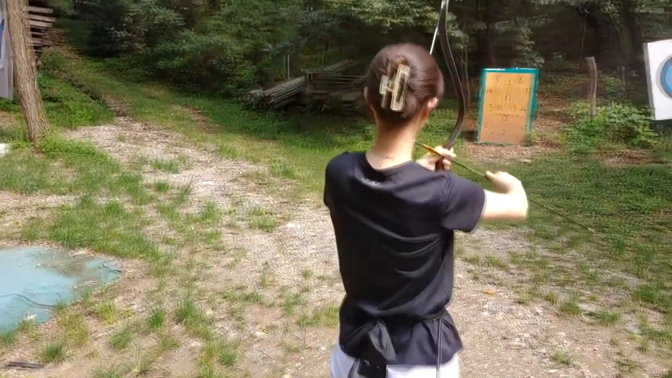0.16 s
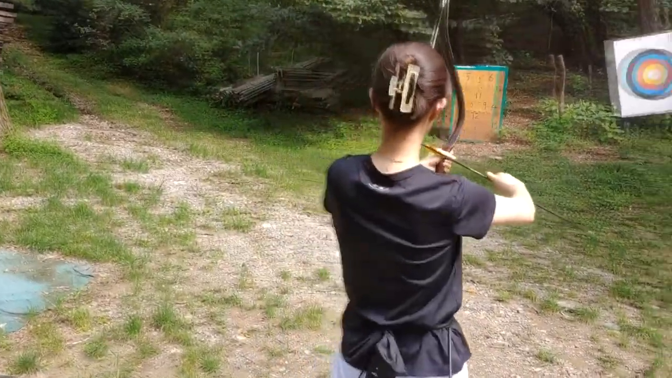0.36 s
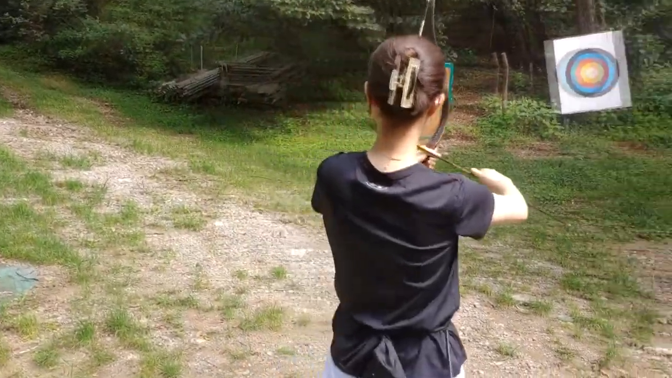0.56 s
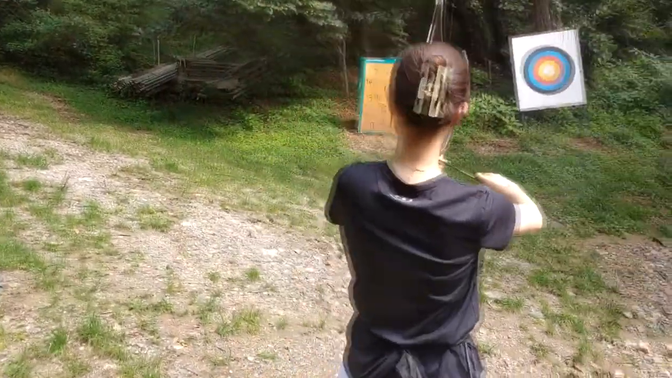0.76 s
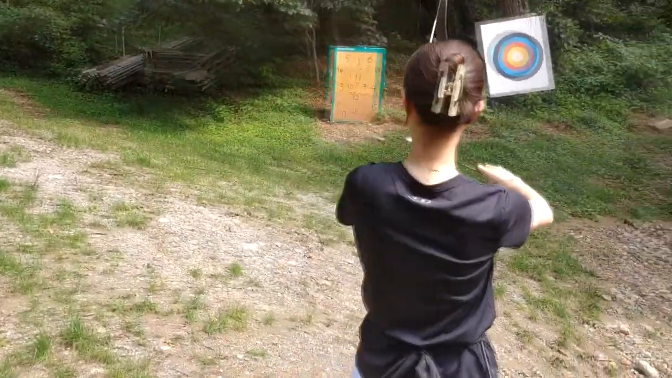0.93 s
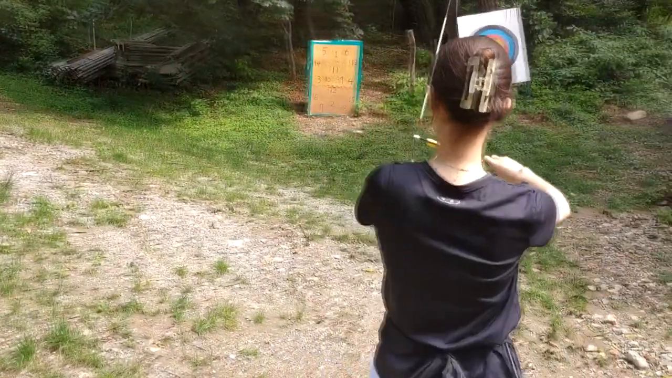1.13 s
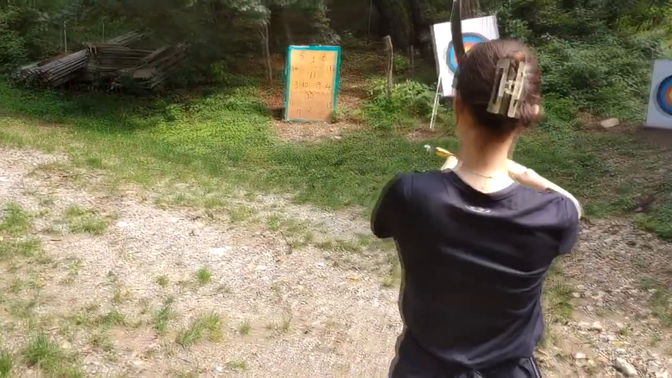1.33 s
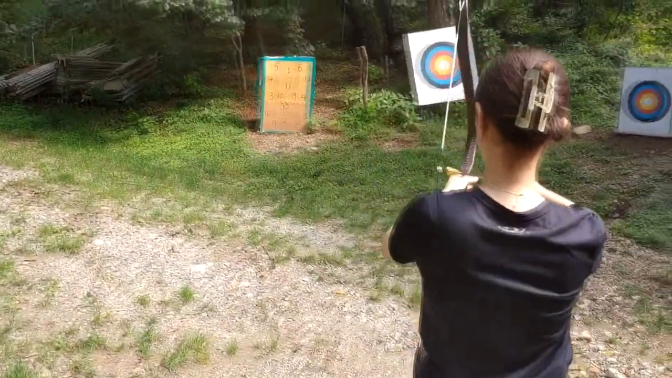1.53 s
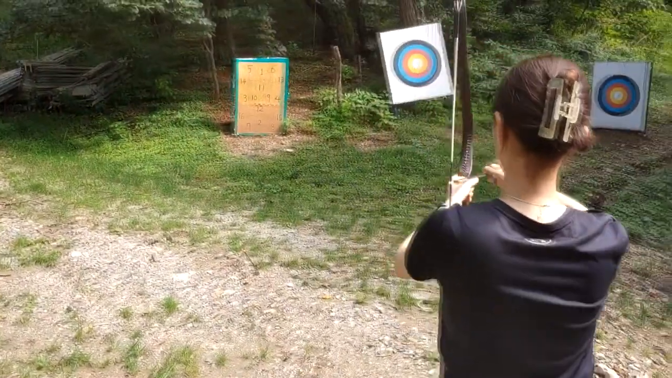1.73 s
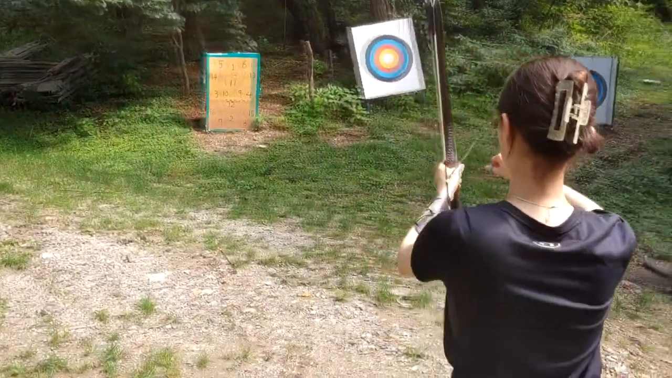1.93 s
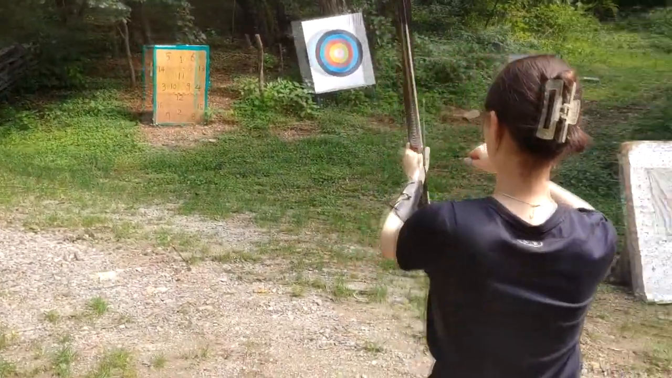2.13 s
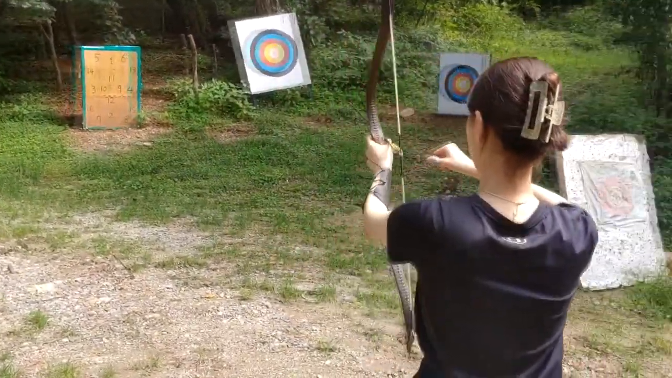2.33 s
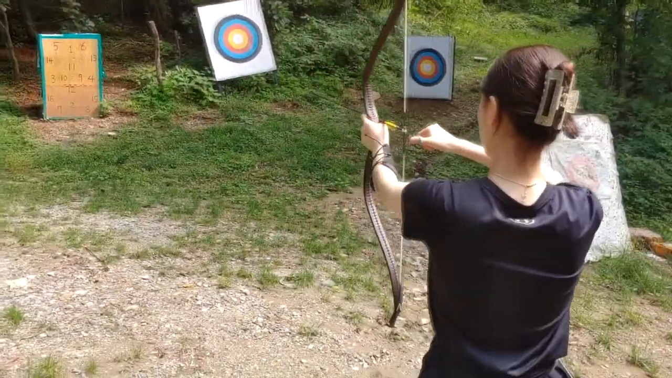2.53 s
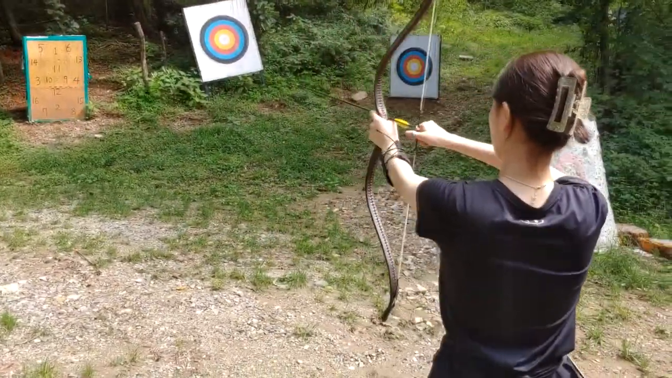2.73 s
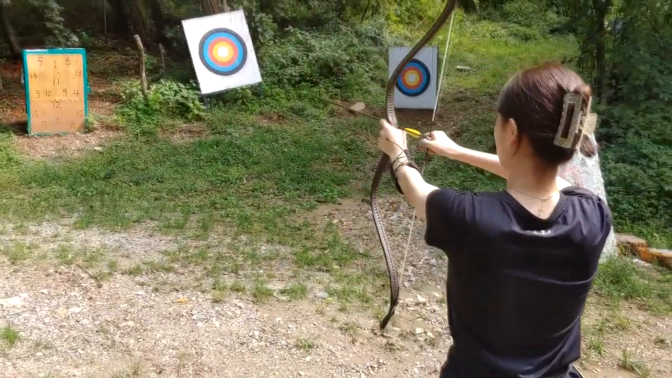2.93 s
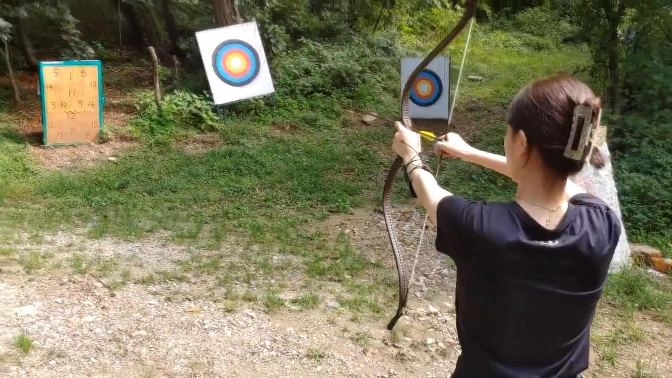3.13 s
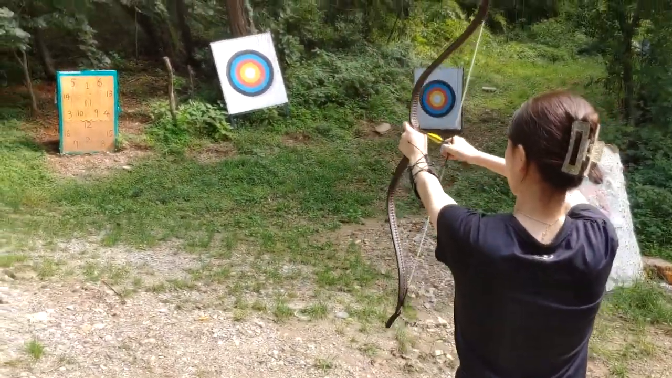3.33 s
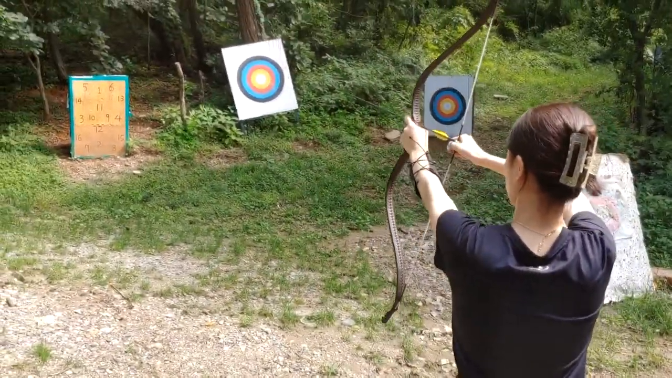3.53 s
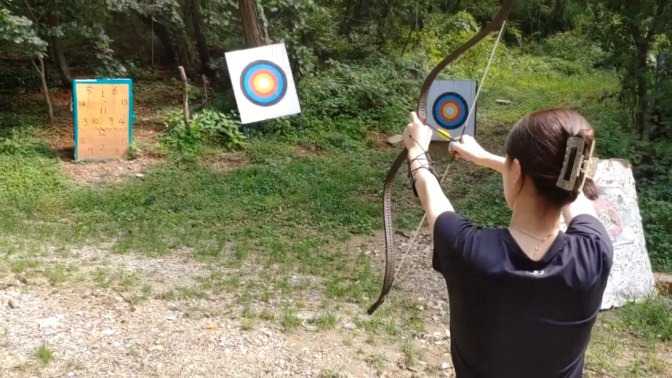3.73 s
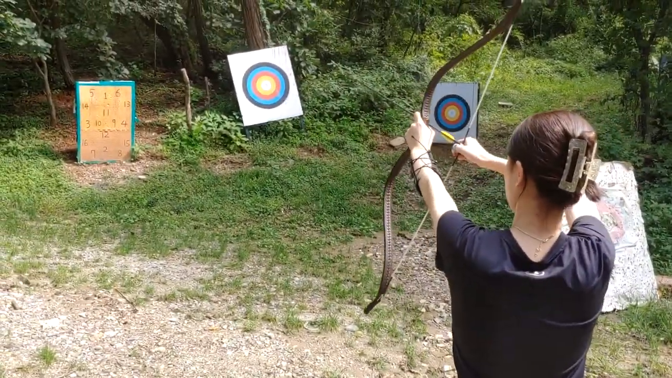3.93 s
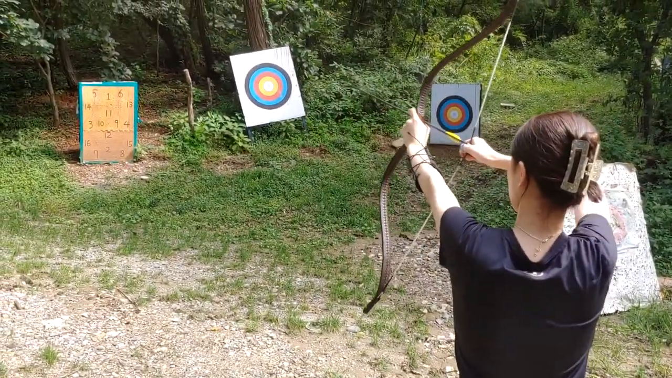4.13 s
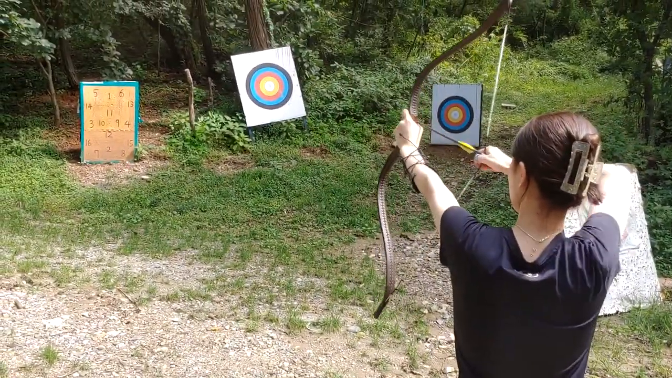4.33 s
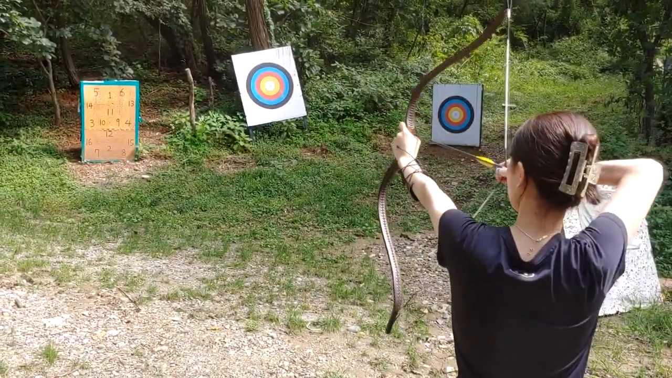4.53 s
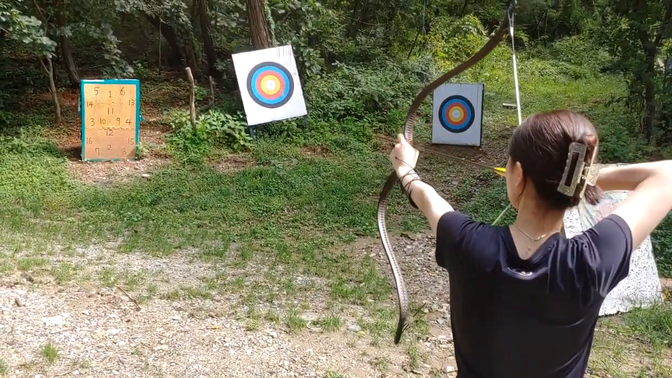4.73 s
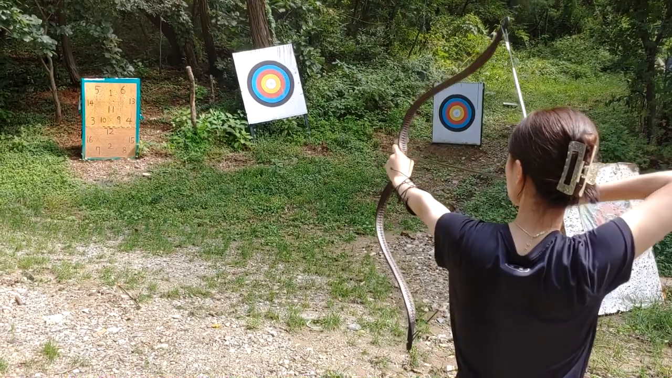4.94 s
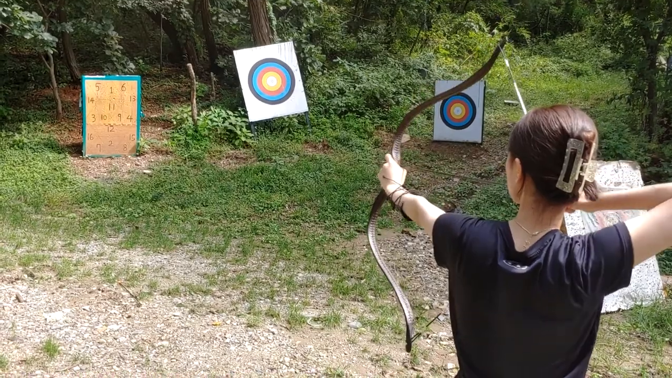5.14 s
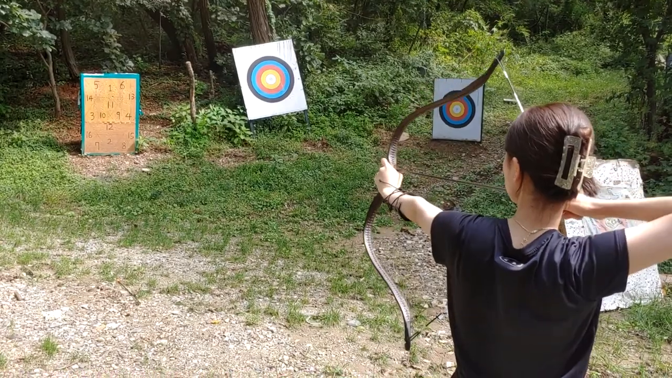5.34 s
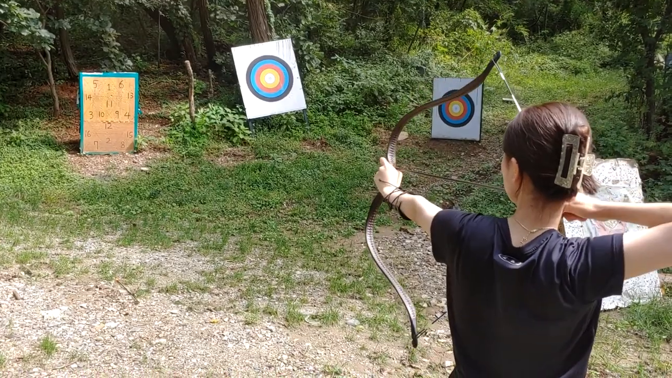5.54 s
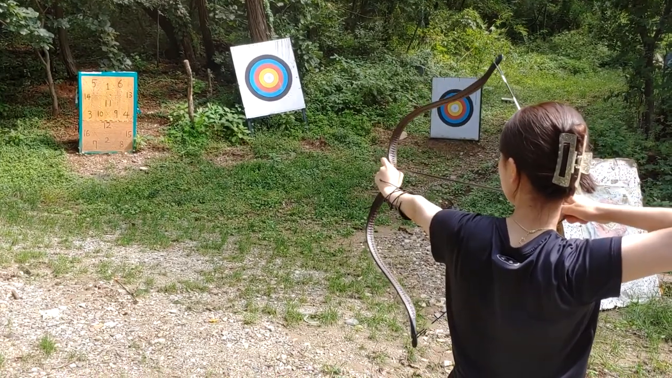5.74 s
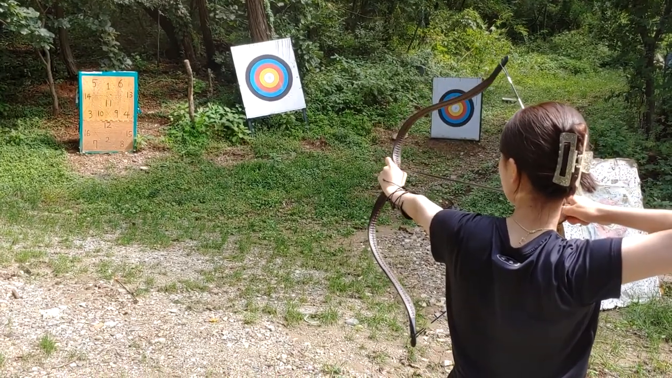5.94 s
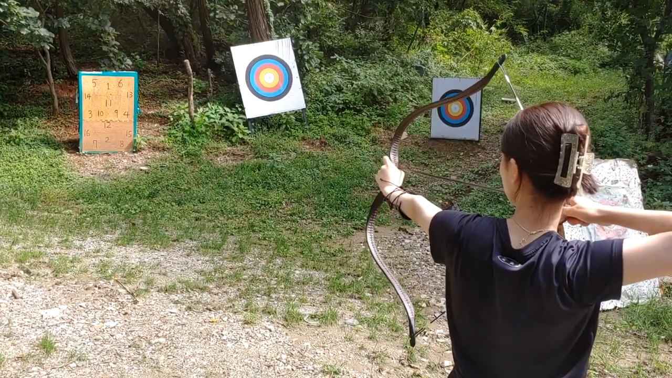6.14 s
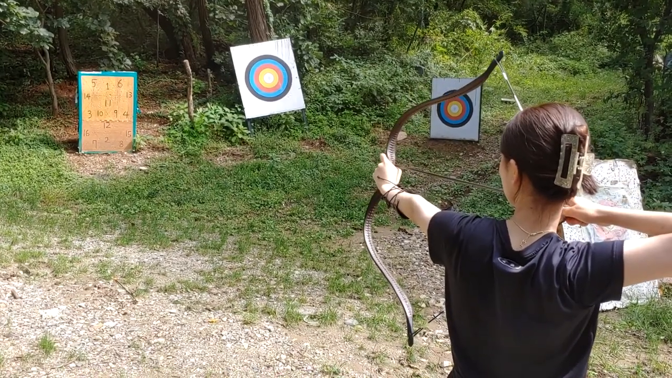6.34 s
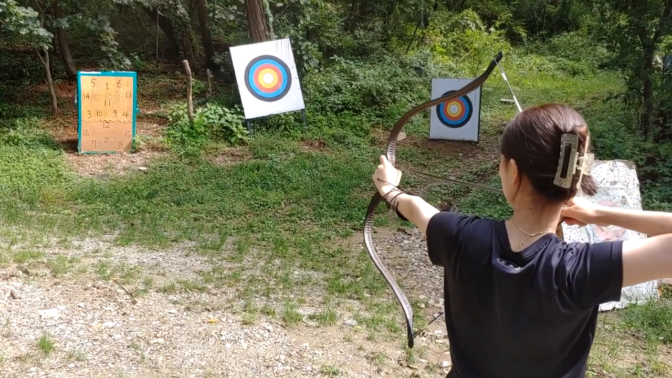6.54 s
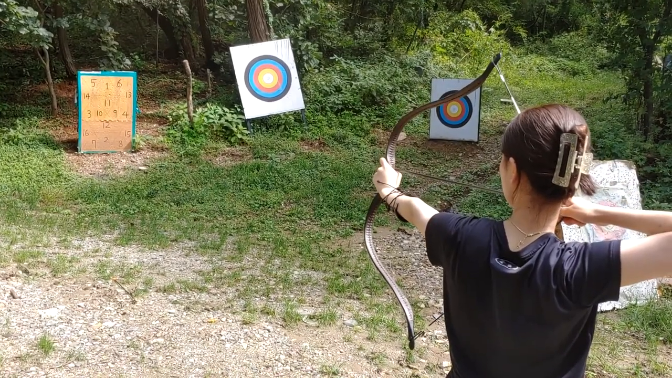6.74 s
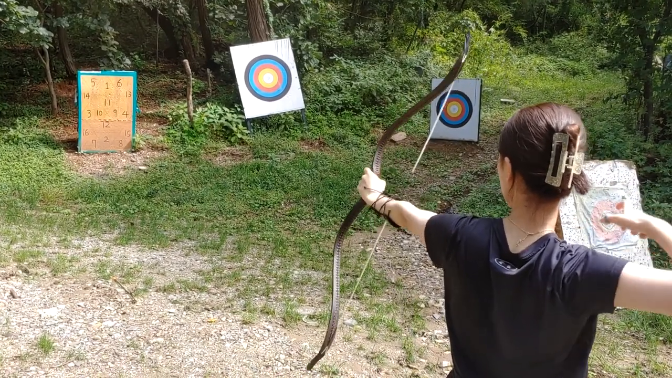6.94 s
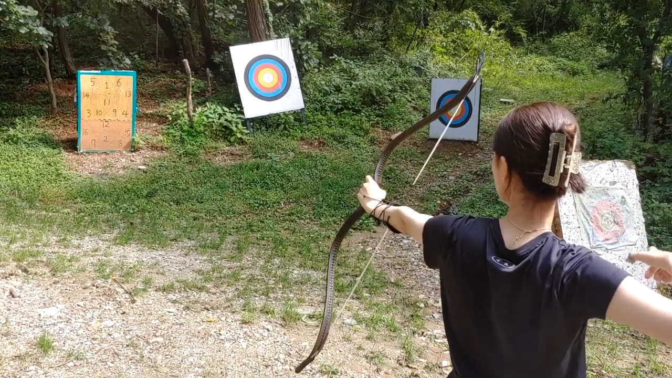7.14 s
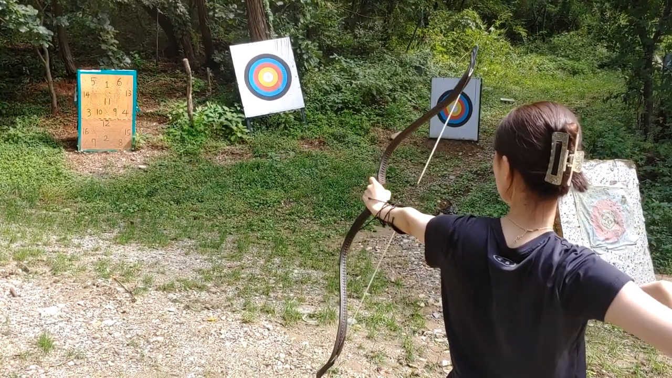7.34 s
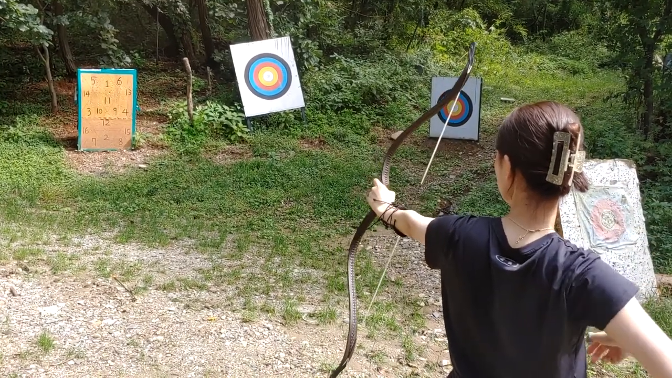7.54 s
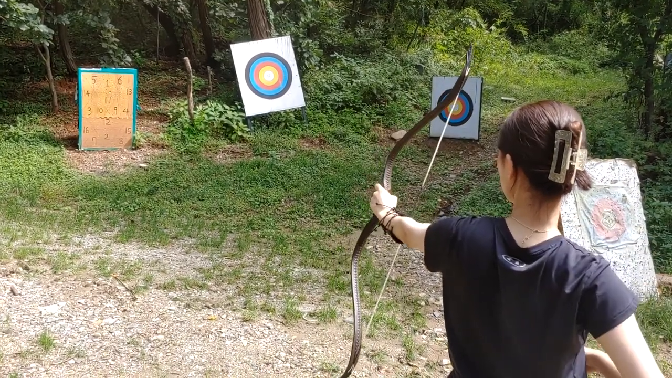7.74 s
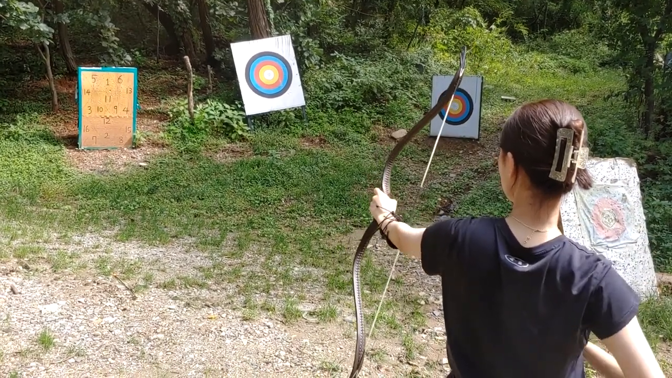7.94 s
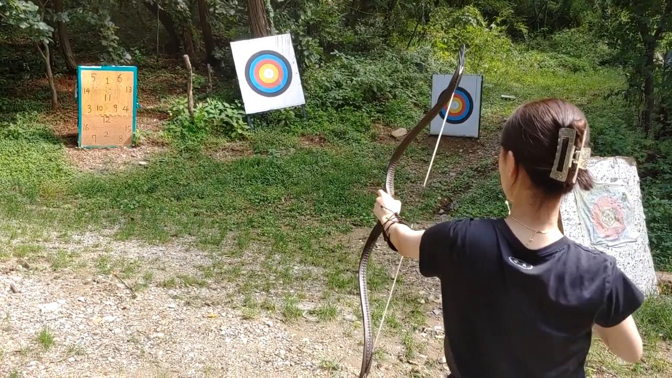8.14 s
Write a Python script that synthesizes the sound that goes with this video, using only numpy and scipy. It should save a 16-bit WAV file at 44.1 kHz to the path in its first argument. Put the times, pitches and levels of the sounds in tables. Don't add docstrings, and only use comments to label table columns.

```python
import sys
import numpy as np
from scipy import signal
from scipy.io import wavfile
from scipy.ndimage import uniform_filter1d

SR = 44100
rng = np.random.default_rng(int(sys.argv[2]) if len(sys.argv) > 2 else 0)


def decibels_to_gain(level_db):
    exponent = np.asarray(level_db, float) / 20
    return 10 ** exponent


def transcribe(signal):
    frames = np.atleast_2d(signal).T
    limited = np.clip(frames, -1, 1)
    pcm = np.round(limited * 32767).astype(np.int16)
    wavfile.write(sys.argv[1], SR, pcm)


N = 365134
HIT_LAG_S = 0.00015


def evened(x):
    return x / np.sqrt(np.mean(x ** 2) + 1e-20)


def read(points, hz):
    f, value = np.transpose(points)
    return np.interp(np.log(hz + 1), np.log(f + 1), value)


def curves(rows):
    s, *columns = np.transpose(rows)
    return [np.interp(np.arange(N) / SR, s, c) for c in columns]


def bursts(rows, shape_db_per_s):
    attack, swell, fall = shape_db_per_s
    start, length, db, *columns = np.transpose(rows)[:, :, None]
    t = np.arange(0, N / SR + .002, .001)
    each = db - attack * np.maximum(start - t, 0) - swell * np.clip(start + length - t, 0, length)
    each = each - fall * np.maximum(t - start - length, 0)
    loudest = each.argmax(0)
    return curves(np.transpose([t, each.max(0)] + [c[loudest, 0] for c in columns]))


def add(mix, s, sound, pan_db=0, lag_s=0):
    for side, sign in enumerate((1, -1)):
        part = mix[side, max(round((s + side * lag_s) * SR), 0):][:len(sound)]
        part += decibels_to_gain(sign * pan_db / 2) * sound[:len(part)]


def filtered(x, order, hz, kind="low"):
    return signal.lfilter(*signal.butter(order, hz, kind, fs=SR), x)


def resonate(x, hz, width_hz):
    r = np.exp(-np.pi * width_hz / SR)
    if np.ndim(hz) == 0:
        pole = r * np.exp(2j * np.pi * hz / SR)
        return 2 * signal.lfilter([(1 - r) ** 2], [1, -2 * pole, pole ** 2], x + 1e-18).real
    turn = np.exp(2j * np.pi * np.cumsum(hz) / SR)
    smooth = signal.lfilter([(1 - r) ** 2], [1, -2 * r, r * r], x * turn.conj() + 1e-18)
    return 2 * (turn * smooth).real


def ring(hz, db, t60, start_s=0.00016):
    t = np.arange(round(t60 * SR)) / SR
    return decibels_to_gain(db - 60 * t / t60) * np.sin(2 * np.pi * hz * t) * (1 - np.exp(-t / start_s))


def wash(spectrum, patchy_db, humps=(), count=N, size=513):
    # Hz, likeness of the channels.
    likeness = [(25, .1), (60, .25), (130, .94), (270, .8), (570, .41), (1200, -.2), (2500, 0)]
    hz = np.fft.rfftfreq(1024, 1 / SR)[:size]
    a, b, c, d, patches = rng.standard_normal((count // 256 + 5, size, 5)).T
    patches = uniform_filter1d(patches, size=8, axis=0)
    patches = evened(uniform_filter1d(patches, size=16, axis=1))
    same = np.clip(read(likeness, hz), -1, 1)[:, None]
    left = a + 1j * b
    z = np.array([left, same * left + np.sqrt(1 - same ** 2) * (c + 1j * d)])
    colour = decibels_to_gain(read(spectrum, hz))
    for f, width_hz, db in humps:
        colour = colour + decibels_to_gain(db) * np.exp(-.5 * ((hz - f) / width_hz) ** 2)
    z = z * colour[:, None] * decibels_to_gain(patchy_db * patches)
    z = np.pad(z, ((0, 0), (0, 513 - size), (0, 0)))
    return evened(signal.istft(z, nperseg=1024, noverlap=768)[1][:, :count])


def clicks(per_s, spread_db, count=N):
    chance = rng.random((2, count)) * SR / per_s
    size = rng.standard_exponential((2, count))
    out = np.zeros((2, N))
    on = chance < 1
    out[:, :count][on] = decibels_to_gain(spread_db * np.minimum(size[on], 5)) * np.sign(chance[on] - .5)
    return out


def knocks(rows, t60, crack_db):
    out, t = np.zeros((2, N)), np.arange(400) / SR
    for (s, db, hz, pan_db), noise in zip(rows, rng.standard_normal((len(rows), 400))):
        tone = ring(hz, db, t60) + ring(min(1.5 * hz, SR / 3), db - 19.0, t60)
        crack = decibels_to_gain(db + crack_db - 60 * t / 0.02) * uniform_filter1d(noise, size=10)
        add(out, s, tone, pan_db, HIT_LAG_S / 2)
        add(out, s, crack, pan_db, HIT_LAG_S / 2)
    return out


def forest(x, slower=1):
    # Hz, t60 in seconds.
    decay = [(100, 0.24), (500, 0.4), (1200, 0.35), (2500, 0.39), (5000, 0.42), (10000, 0.32)]
    taps = np.zeros((2, SR))
    at = np.arange(200, SR - 20, 20) + rng.integers(0, 20, (2, (SR - 201) // 20))
    np.put_along_axis(taps, at, rng.choice([-1., 1.], at.shape), 1)
    hz, t, z = signal.stft(taps, SR, nperseg=256)
    dying = decibels_to_gain(-60 * t / slower / read(decay, hz)[:, None])
    tail = signal.istft(z * dying, SR, nperseg=256)[1]
    return signal.fftconvolve(x, tail / np.linalg.norm(tail[0]), axes=1)[:, :N]


def aircraft():
    # time in seconds, level in dB.
    drone = [(0, -39), (.2, -42.5), (.9, -48.5), (1.4, -51.5), (1.75, -42), (2.25, -44.5), (2.45, -34.5),
             (3.0, -34.5), (3.95, -36), (4.25, -47.5), (4.9, -36.5), (5.25, -45), (5.4, -33.5),
             (5.6, -54.5), (6.9, -49), (7.4, -58), (7.95, -49), (8.28, -56.5)]
    # time in seconds, Hz.
    hum_pitch = [(0, 212.4), (2.5, 203.7), (4, 201.1), (5.4, 191.4), (6.5, 196.4), (8.28, 190)]
    # multiple of the hum pitch, width in Hz, level in dB.
    overtones = [(0.621, 12, -2.5), (0.75, 19, -4.5), (1.5, 17.4, -7.5), (1.78, 24, -8.5),
                 (2.62, 28, -17.5), (3.45, 35, -23)]
    # Hz, dB.
    rumble_spectrum = [(20, -10), (32, -12), (55, 5), (80, -15.5), (125, -1.5), (160, -6.5), (250, -25),
                       (400, -85.5)]
    roar_spectrum = [(90, -26), (130, -1.5), (250, 0), (330, 1), (420, -6), (700, -19), (1200, -43),
                     (2500, -62)]
    # time in seconds, level in dB.
    roar_swell = [
        [(0.0, -53), (0.34, -55), (1.02, -50.5), (1.32, -56), (1.61, -59), (1.87, -51.5), (2.35, -54.5),
         (2.76, -44), (2.99, -44), (4.01, -52), (4.24, -50.5), (4.55, -49.5), (5.81, -54), (6.34, -58.5),
         (6.8, -56.5)],
    ]

    hum_db, hum_hz = curves(drone)[0], curves(hum_pitch)[0]
    swing_db = hum_db + 41.5
    roar_db = 2.5 + curves(roar_swell[0])[0] + 0.09 * swing_db
    rumble_db = -45.5 + 0.27 * swing_db
    noise = rng.standard_normal((N, 2)).T
    shifted = np.array([np.roll(noise[0], shift=8), noise[0]])
    noise = shifted + 0.16 * noise[1] * [[-1], [1]]
    hum = evened(resonate(noise, hum_hz, 20.8))
    roar = wash(roar_spectrum, 3.8, size=80)
    for multiple, width_hz, db in overtones:
        roar = roar + decibels_to_gain(db) * evened(resonate(noise[0], multiple * hum_hz, width_hz))
    idle = evened(resonate(noise + 0.21 * rng.standard_normal((N, 2)).T, 55.4, 7))
    out = decibels_to_gain(hum_db + [[-.6], [.6]]) * hum + decibels_to_gain(roar_db) * roar
    return out + decibels_to_gain(rumble_db) * wash(rumble_spectrum, 1.7, size=16) + decibels_to_gain(-48) * idle


def insects():
    # Hz, width in Hz, level in dB, clicks per second, throbs per second,
    # throb depth 0-1, left-right in dB.
    chorus = [(6573, 610, -60.5, 6600, 55, 0, 10), (8500, 770, -72, 2700, 36, 0.5, -16),
              (4825, 970, -61.5, 2500, 30, 0, -0.5), (9860, 1000, -75.5, 4700, 3.4, 0.4, -1.5)]
    # start in seconds, length in seconds, level at the end in dB.
    cricket = [(.02, .05, -62), (.21, 0.037, -62), (.45, 0.14, -54), (.64, 0.11, -56), (.87, 0.057, -58),
               (1.05, 0.058, -59), (1.27, 0.025, -57), (1.43, 0.037, -57), (1.58, 0.13, -55.5),
               (1.81, 0.049, -53.5), (1.98, 0.05, -59), (2.66, 0.13, -58), (2.88, 0.087, -55.5),
               (3.12, 0.19, -62), (3.74, .24, -54), (4.19, 0.021, -59), (4.66, 0.32, -53.5),
               (5.1, .11, -61), (5.75, 0.34, -53), (6.85, .32, -53), (7.9, 0.084, -60), (8.03, 0.22, -55)]

    t, out = np.arange(N) / SR, np.zeros((2, N))
    for hz, width_hz, db, per_s, throb_hz, depth, pan_db in chorus:
        throb = 1 + depth * np.sin(2 * np.pi * throb_hz * t)
        kind = evened(resonate(throb * clicks(per_s, 2.9), hz, width_hz))
        out += decibels_to_gain(db + np.array([[.5], [-.5]]) * pan_db) * kind
    pulses = 1 + 0.15 * np.sin(2 * np.pi * 107 * t)
    cricket_hz = 4786 * (1 + 0.011 * np.sin(2 * np.pi * 3.1 * t))
    trill = evened(pulses * resonate(clicks(6500, 0.91), cricket_hz, 200.2))
    return out + decibels_to_gain(bursts(cricket, (280, 17, 320))[0]) * trill


def forest_air():
    # Hz, dB.
    air_spectrum = [(180, -38.5), (330, -2.5), (1040, -15), (2310, -24), (4100, -20), (5900, -44.5),
                    (11000, -73.5), (15500, -75)]
    # Hz, spread in Hz, level in dB.
    swarm = [(4850, 334, -15), (6717, 294, -8.5), (7400, 500, -26.5), (8630, 376, -18), (9850, 270, -35.5)]
    return decibels_to_gain(-53.5) * wash(air_spectrum, 0.87, swarm)


def birds():
    # start in seconds, length in seconds, start Hz, end Hz, level in dB.
    whistles = [(4.45, .09, 3900, 3950, -61), (6.595, .035, 3830, 4000, -59),
                (3.236, .045, 2850, 2800, -57), (3.89, .035, 3200, 2900, -62),
                (4.96, .045, 2750, 2820, -63), (4.42, .04, 5650, 5500, -64), (6.07, .04, 2880, 2780, -59),
                (6.35, .045, 2860, 2790, -58), (5.225, .03, 3350, 3250, -62), (6.675, .03, 3480, 3440, -58)]
    # time in seconds, Hz, level in dB.
    warble = [(5.043, 3880, -66), (5.052, 3820, -55), (5.064, 3560, -58), (5.08, 3430, -61),
              (5.1, 3720, -63), (5.118, 3580, -57), (5.138, 3400, -63), (5.15, 3080, -59),
              (5.168, 2900, -68)]
    # start in seconds, length in seconds, level in dB, start Hz, end Hz.
    scolds = [
        (3.208, .03, -59, 4500, 3200),
        (6.04, .045, -61, 4400, 3500),
        (6.318, .04, -59, 4800, 3600),
    ]
    # start in seconds, length in seconds, level in dB, Hz.
    katydids = [(0, 0.035, -55, 3400), (.36, .3, -63.5, 3280), (1.0, .1, -64.5, 3350), (1.4, .42, -62.5, 3450),
                (2.0, .08, -63, 3440), (2.38, .07, -65, 3690), (2.59, .04, -60, 3400), (2.8, 0.064, -66, 3390),
                (3.17, .03, -60, 3613), (3.38, 0.072, -64.5, 3490), (3.72, .36, -63, 3460),
                (4.2, 0.12, -63.5, 3640), (4.81, 0.15, -63, 3650), (5.15, 0.061, -61, 3435),
                (5.37, 0.043, -63, 3357), (5.55, 0.15, -64, 3350), (5.83, 0.095, -60, 3470),
                (6.14, 0.028, -63.5, 3460), (6.33, .1, -68, 3540), (6.59, 0.1, -65.5, 3470),
                (7.25, 0.11, -61, 3480), (7.55, 0.13, -65, 3540), (7.84, 0.33, -67, 3480)]

    far = np.zeros((2, N))
    for (s, length_s, start_hz, end_hz, db), chance in zip(whistles, rng.random((len(whistles), 2))):
        hz = np.linspace(start_hz, end_hz, round(length_s * SR))
        tone = signal.windows.tukey(len(hz), .5) * np.sin(2 * np.pi * np.cumsum(hz) / SR)
        add(far, s, decibels_to_gain(db) * tone, 4 * chance[0] - 2, 0.00021 * chance[1])
    far *= 1 + .55 * evened(uniform_filter1d(rng.standard_normal(N), size=50))

    near = np.zeros((2, N))
    s, hz, db = np.transpose(warble)
    t = np.arange(s[0], s[-1], 1 / SR)
    phase = 2 * np.pi * np.cumsum(np.interp(t, s, hz)) / SR
    add(near, s[0], decibels_to_gain(np.interp(t, s, db)) * np.sin(phase), 1)
    for s, length_s, db, start_hz, end_hz in scolds:
        hz = np.linspace(start_hz, end_hz, round(length_s * SR))
        rasp = evened(resonate(rng.standard_normal(len(hz)), hz, 1000))
        add(near, s, decibels_to_gain(db) * np.hanning(len(hz)) ** .5 * rasp)

    chatter_db, chatter_hz = bursts(katydids, (220, 6, 200))
    chatter = evened(resonate(clicks(4000, 1.5), chatter_hz, 480))
    blur = decibels_to_gain(-2.5) * forest(far + decibels_to_gain(4) * near, 0.48)
    return far + near + blur + decibels_to_gain(chatter_db) * chatter


def gravel():
    # start in seconds, length in seconds, level in dB, grit in dB.
    rolls = [(0, 0.005, -52.5, -21), (.13, 0.17, -60.5, -11), (.46, .06, -57, -11), (.56, 0.31, -56, -5),
             (1.25, 0.606, -59, -11.5), (2.07, 0.079, -56, -5.5), (2.4, .15, -61.5, -7.5),
             (2.56, 0.233, -56, -4.5), (2.75, 0.28, -61.5, -3), (3.15, 0.063, -57, -6.5)]
    # start in seconds, length in seconds, level in dB, grit in dB.
    slips = [(.088, .01, -51, -13), (.525, 0.011, -52, -3), (1.02, 0.028, -55, -20), (1.105, .01, -56, -13),
             (1.177, 0.0037, -51, -37)]
    # start in seconds, length in seconds, level in dB, Hz.
    scuffs = [(.484, 0.065, -58, 780), (2.075, 0.069, -55, 1230), (2.56, 0.18, -54, 900),
              (3.14, 0.057, -65, 770)]
    # Hz, level in dB, t60 in seconds.
    stones = [(900, 9.5, 0.0024), (1275, -4.5, 0.0056), (1790, 0, 0.0028), (2730, 1.5, 0.0028),
              (3800, -3, 0.004)]
    # time in seconds, level in dB, Hz, left-right in dB.
    pebbles = [(0.038, -36.5, 740, -1), (0.097, -37, 1230, -10), (0.263, -39.5, 830, -4),
               (0.448, -43, 1280, -9), (0.471, -42, 620, 0), (0.4865, -33.5, 786, 0), (0.4895, -36, 900, 0),
               (0.4885, -43, 2900, 0), (0.501, -39, 800, 0), (0.515, -41, 900, -2),
               (0.532, -34.5, 1360, -8), (0.5325, -38.5, 2050, -5), (0.539, -45, 2000, -3),
               (0.551, -40, 760, 0), (0.606, -40.5, 1790, -3), (0.771, -41, 1200, -10),
               (1.1765, -34, 860, -4), (1.179, -30, 1600, -5), (1.219, -42, 1130, -5),
               (1.406, -43.5, 1230, -3), (2.057, -43, 1040, 0), (2.072, -41, 1150, 0),
               (2.104, -38, 1300, 0), (2.113, -40, 1350, -2), (2.119, -41, 1400, 0), (2.083, -32, 1390, -1),
               (2.096, -32, 1440, 1), (2.128, -37, 1170, 5), (2.469, -64, 832, -0.5),
               (3.176, -40.5, 1420, -6), (3.18, -36, 750, -3), (5.984, -41.5, 826, -6),
               (5.984, -48, 2100, -9)]
    ticks = [(0.656, -31, 8720, -2.5), (0.7028, -43, 8500, 10), (1.3624, -41, 9600, -5),
             (1.575, -33, 9300, -12), (2.8674, -54, 8630, -12)]

    half = N // 2
    roll_db, roll_grit_db = bursts(rolls, (250, 1.8, 130))
    slip_db, slip_grit_db = bursts(slips, (1500, 41, 740))
    scuff_db, scuff_hz = bursts(scuffs, (520, 12, 490))
    grains = 0
    for hz, db, t60 in stones:
        train = clicks(400, 3.3, count=half)[:, :half]
        train = train + 0.12 * train[::-1]
        grains += signal.oaconvolve(train, ring(hz, db, t60)[None])[:, :half]
    grains = np.pad(grains, ((0, 0), (0, N - half)), "reflect")
    dust = clicks(800, 4.9, count=half)
    scuff = decibels_to_gain(scuff_db) * evened(resonate(dust + 0.21 * dust[::-1], scuff_hz, 550))
    grit = evened(resonate(clicks(2600, 2.4, count=half), 8860, 3300))
    crunch = (decibels_to_gain(roll_db) + decibels_to_gain(slip_db)) * decibels_to_gain(1.0) * evened(grains)
    crunch += (decibels_to_gain(roll_db + roll_grit_db) + decibels_to_gain(slip_db + slip_grit_db)) * decibels_to_gain(-3.5) * grit
    fine = np.diff(knocks(ticks, 0.0042, 2.7), axis=1, prepend=0)
    return crunch + scuff + knocks(pebbles, 0.012, 0.46) + fine


def thuds():
    # time in seconds, level in dB.
    footfalls = [
        (0.539, -39),
        (0.639, -37),
        (0.849, -34),
        (0.99, -34.5),
        (1.129, -35.5),
        (5.97, -34.5),
    ]
    out, t = np.zeros((2, N)), np.arange(round(0.035 * SR)) / SR
    bump = np.hanning(len(t)) * np.sin(2 * np.pi * 53 * t)
    for s, db in footfalls:
        add(out, s, decibels_to_gain(db + 5.5) * bump, -1, -.001)
    return out


def chips():
    # time in seconds, level in dB, Hz, left-right in dB.
    small_stones = [(0.999, -44, 826, -0.5), (1.023, -38, 915, 0.0), (1.035, -43, 1000, -4),
                    (1.108, -49, 1130, -3.0), (1.468, -44, 1460, 0.0), (1.519, -48, 805, -1.5),
                    (1.613, -40, 824, -2), (2.071, -39, 853, -0.5), (2.109, -40, 1340, 0.0),
                    (2.139, -39, 1360, 0.5), (2.145, -36, 1200, 0.0), (2.277, -46, 1010, -4),
                    (2.328, -47, 1140, 0.5), (2.394, -50, 1110, -1.5), (2.521, -44, 751, -2.0),
                    (2.537, -43, 1300, -2.0), (2.566, -46, 1180, -2.0), (2.585, -43, 760, 0.0),
                    (2.609, -42, 1250, -4), (2.643, -47, 764, -1.0), (2.658, -41, 918, -5),
                    (2.681, -39, 1030, -2), (2.7, -38, 756, 2), (2.719, -40, 751, -0.5),
                    (2.749, -46, 767, -1.0), (2.808, -43, 818, 0.5)]
    return knocks(small_stones, 0.011, -2.5)


def release():
    # time in seconds, level in dB, Hz, left-right in dB.
    snaps = [(6.8745, -38, 600, -4.5), (6.877, -31.5, 770, -2.5), (6.8848, -20.5, 1550, 0.5),
             (6.8945, -18.5, 1133, 2.5), (6.8978, -22.5, 1180, -2), (6.9, -28, 1413, 2),
             (6.8865, -26, 1900, 1), (6.888, -27, 1300, -1), (6.891, -28, 1050, 1), (6.906, -29, 1750, 1.5),
             (6.9125, -30, 1400, -0.5), (6.92, -33, 900, 0), (6.926, -34.5, 1300, 0),
             (6.909, -26, 1500, -10), (6.886, -29, 3150, -1.5), (6.8875, -29.5, 2700, -0.5),
             (6.8895, -29.5, 1800, 0), (6.8925, -26.5, 640, -0.5), (6.896, -26.5, 620, 0),
             (6.8975, -29.5, 1750, 1.5), (6.9015, -35, 630, 0), (6.904, -36.5, 2293, 0),
             (6.9085, -28.5, 3150, 0), (6.911, -34, 2500, 0.5), (6.916, -34, 1900, 2)]
    # time in seconds, level in dB.
    whoosh = [(6.868, -59), (6.883, -47.5), (6.893, -44), (6.9, -27.5), (6.912, -36), (6.94, -51),
              (6.975, -66.5), (7.03, -80.5)]
    # Hz, dB.
    fletching = [(300, 1), (900, -2.5), (2800, -1.5), (5000, -3.5), (10000, -16), (15000, -21.5)]
    # time in seconds, level in dB, left-right in dB, treble in dB per octave.
    rattle = [(6.9815, -19, 2, -1), (6.9868, -25, -1.5, -9), (6.9975, -19.5, 2, 0), (7.0028, -26, -6, -9),
              (7.014, -38, 2, -14)]
    # Hz, level in dB, t60 in seconds.
    shaft = [(760, -15, 0.0073), (1280, -11.5, .007), (1780, -10, 0.0077), (2050, -3.5, 0.011),
             (2670, -4, 0.0091), (2900, -7.5, .009), (3700, -9, .006), (4400, -5, 0.005),
             (5300, -8.5, 0.0058), (6400, -12.5, 0.004), (8400, -20, .003)]
    limbs = [(128, -20.5, 0.052), (231.5, -36.5, 0.26), (530, -36, .04)]

    out = knocks(snaps, 0.0074, -2)
    past = slice(round(whoosh[0][0] * SR), round(whoosh[-1][0] * SR))
    brush = decibels_to_gain(curves(whoosh)[0][past])
    out[:, past] += brush * wash(fletching, 6.7, count=SR // 4)[:, :len(brush)]
    crack = uniform_filter1d(rng.standard_normal(100), size=3)
    add(out, 6.9003, decibels_to_gain(-19 - np.arange(100) / 2.6) * crack)
    for s, db, pan_db, treble_db in rattle:
        for hz, mode_db, t60 in shaft:
            level_db = db + mode_db + treble_db * max(np.log2(hz / 2500), 0)
            add(out, s, ring(hz * rng.uniform(0.94, 1.05), level_db, t60, 0.00028), pan_db)
    for mode in limbs:
        add(out, 6.9045, -ring(*mode, .001))
    return out


def hit():
    # Hz, level in dB, t60 in seconds, delay in seconds.
    board = [(123, -13.5, 0.078, 0.0041), (190, -21.5, 0.07, 0.005), (301, -9.5, 0.02, 0.0001),
             (285.3, -17.5, 0.1, 0.0053), (367, -27, 0.074, 0.0057), (687, -8, 0.024, .004),
             (802, -11, 0.029, 0.004)]
    # Hz, level in dB, t60 in seconds.
    face = [(2000, -31.5, .012), (2640, -17, 0.012), (3280, -24.5, 0.012), (4570, -29.5, 0.012),
            (6800, -28, 0.01), (8600, -31, .008), (10270, -35, .008), (13200, -35.5, .005)]
    # delay in seconds, level in dB, left-right in dB.
    echoes = [(0.0154, -15.5, -8.5), (.034, -19.5, 5), (.0375, -26.5, -2), (.043, -29, 2.5)]

    hit_s, punch_s, swell_s, spread_db = 7.1767, 0.0027, .02, 13.5
    t = np.arange(round(punch_s * SR)) / SR
    blow = np.zeros((2, SR // 4))
    add(blow, 0, decibels_to_gain(-0.5) * np.sin(np.pi * t / punch_s) ** .4 * np.sin(2 * np.pi * 1230 * t))
    for hz, db, t60, delay_s in board:
        add(blow, delay_s, ring(hz, db, t60))
    out, spread = np.zeros((2, 2, N))
    add(out, hit_s, -blow[0], 0, HIT_LAG_S)

    hiss = filtered(rng.standard_normal(round(swell_s * SR)), 2, (950, 1500), "band")
    add(out, hit_s - swell_s, decibels_to_gain(-39) * np.linspace(0, 1, len(hiss)) ** 2 * evened(hiss))
    for mode in face:
        add(out, hit_s + .0004, ring(*mode), 4)
    thin = filtered(blow[0], 1, 400, "high")
    for delay_s, db, pan_db in echoes:
        add(out, hit_s + delay_s, decibels_to_gain(db) * thin, pan_db, HIT_LAG_S)

    add(spread, hit_s, decibels_to_gain([spread_db]))
    spread = filtered(spread, 2, (160, 1620), "band")
    first, last = round(0.011 * SR), round(0.056 * SR)
    trunks = rng.standard_normal((2, last - first)) * (rng.random((2, last - first)) < .04)
    trunks = trunks * np.hanning(last - first)
    trunks = np.pad(trunks / np.linalg.norm(trunks[0]), ((0, 0), (first, 0)))
    out += decibels_to_gain(1.5) * signal.oaconvolve(spread + decibels_to_gain(-19.5) * out, trunks, axes=1)[:, :N]

    late = slice(round(hit_s * SR) - 1000, N)
    tail = forest((spread + decibels_to_gain(-24.0) * out)[:, late])
    hill = filtered(spread, 2, (900, 2000), "band")
    tail = tail + decibels_to_gain(-3.5) * forest(hill[:, late], 3.07)
    undergrowth = np.zeros((2, N))
    add(undergrowth, hit_s, decibels_to_gain([spread_db - 12.5]))
    tail += forest(filtered(undergrowth[:, late], 2, (2100, 3600), "band"), 1.97)
    return out + np.pad(tail[:, :N - late.start], ((0, 0), (late.start, 0)))


def scene():
    near = release() + gravel()
    near = near + decibels_to_gain(-11.5) * forest(near) + hit()
    return near + chips() + thuds() + aircraft() + insects() + birds() + forest_air()


def gate(x):
    hz, t, z = signal.stft(x, SR, nperseg=1024, noverlap=512)
    power = uniform_filter1d((abs(z) ** 2).mean(0), size=7, axis=0)
    power = uniform_filter1d(power, size=3, axis=1)
    power /= uniform_filter1d(np.median(power, axis=1), size=20)[:, None]
    limit = np.percentile(power[(hz > 2000) & (hz < 9000)], 7)
    faint = (power < limit) & (hz > 2000)[:, None]
    return signal.istft(z * decibels_to_gain(-14 * faint), SR, nperseg=1024, noverlap=512)[1][:, :N]


def band_limit(x):
    return signal.sosfilt(signal.butter(12, 15140, fs=SR, output="sos"), x)


def record(dry):
    power = signal.lfilter([.002], [1, -.998], (dry ** 2).mean(0))
    power_db = 10 * np.log10(power + 1e-12)
    fall_db = np.arange(N) * 2.34 / SR
    over_db = np.maximum.accumulate(.5 * (power_db + 18.0) + fall_db) - fall_db
    over_db = np.maximum(over_db, 0)
    dull = filtered(dry, 9, 11220) + decibels_to_gain(-32) * filtered(dry, 6, 13400, "high")
    hiss = evened(filtered(rng.standard_normal(dry.shape), 3, (13300, 15100), "band"))
    hiss = decibels_to_gain(-97.5 + 1.2 * over_db) * hiss
    return band_limit(np.clip(gate(dull) / decibels_to_gain(over_db) + hiss, -.99, .99))


dry = scene()
out = record(dry)
transcribe(out)
```